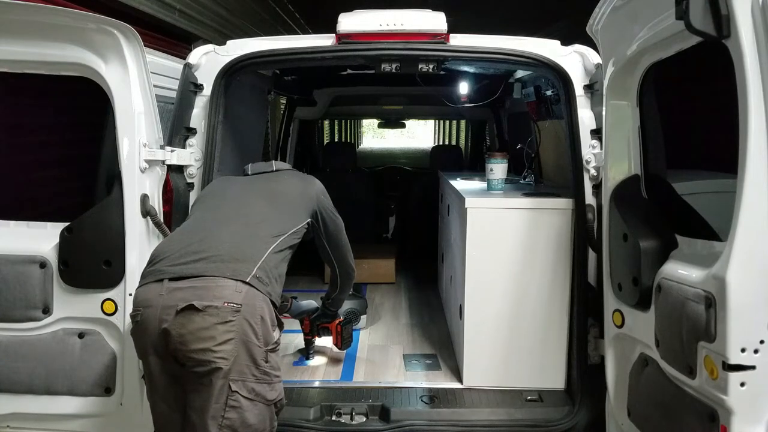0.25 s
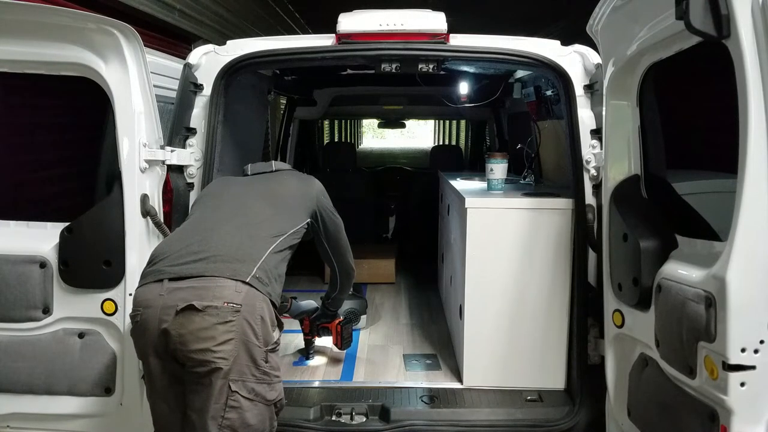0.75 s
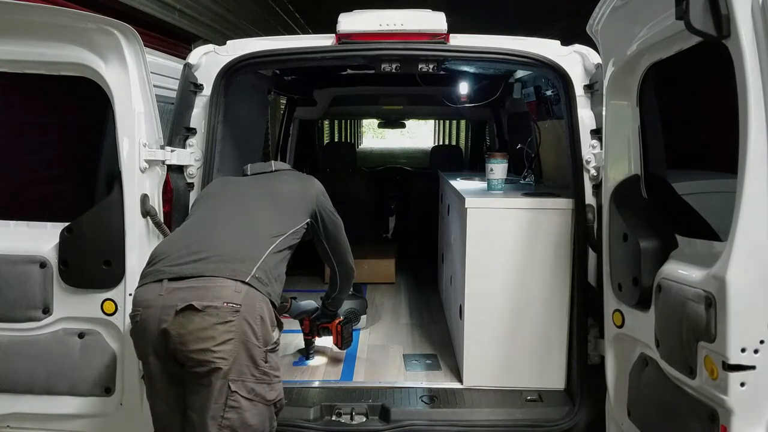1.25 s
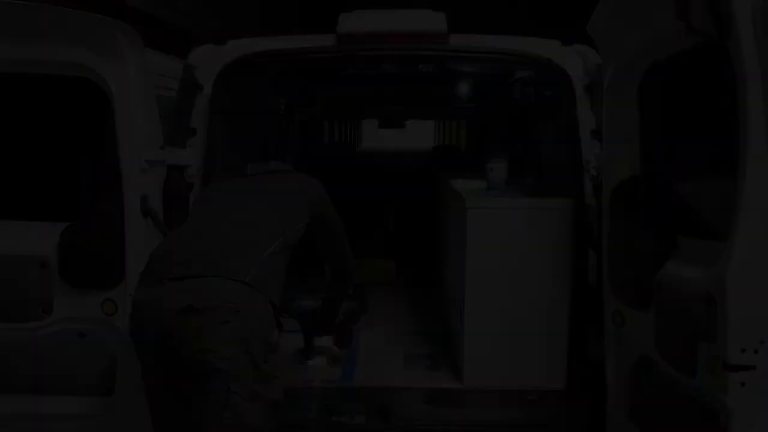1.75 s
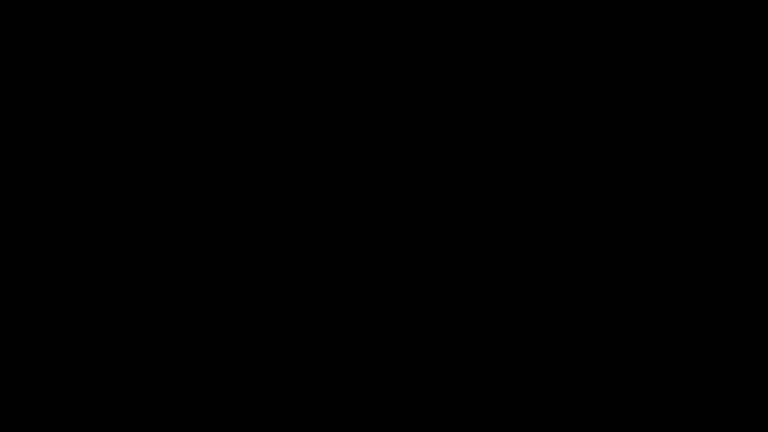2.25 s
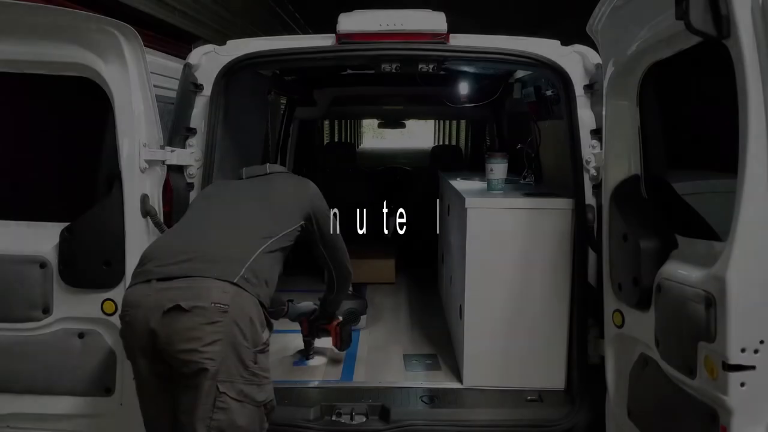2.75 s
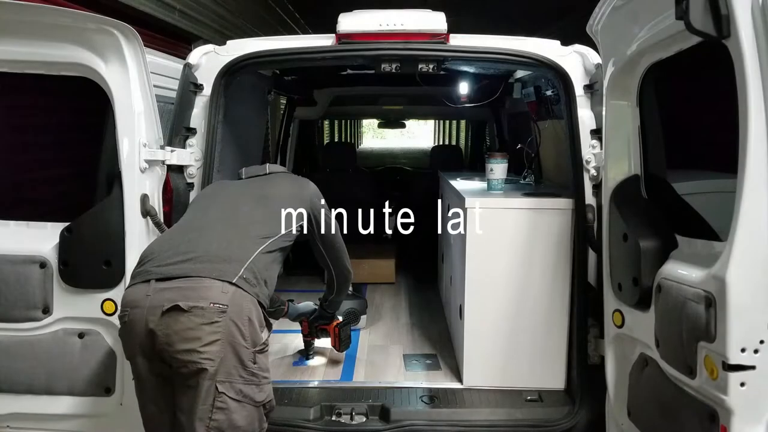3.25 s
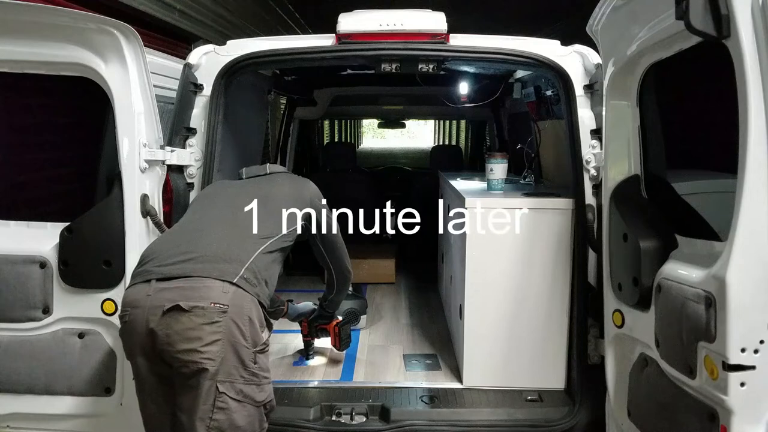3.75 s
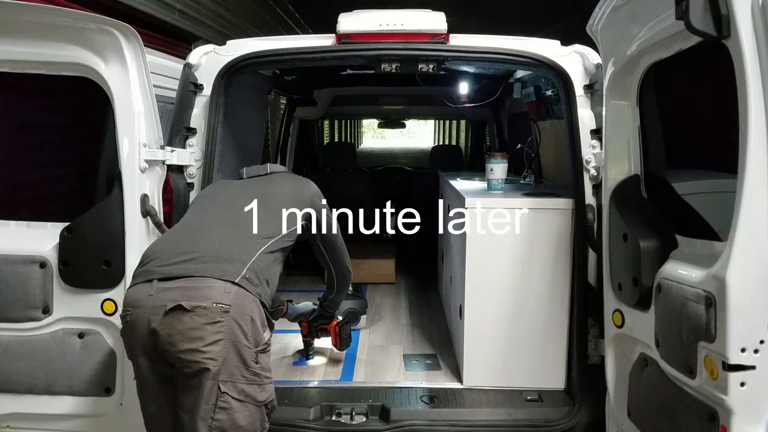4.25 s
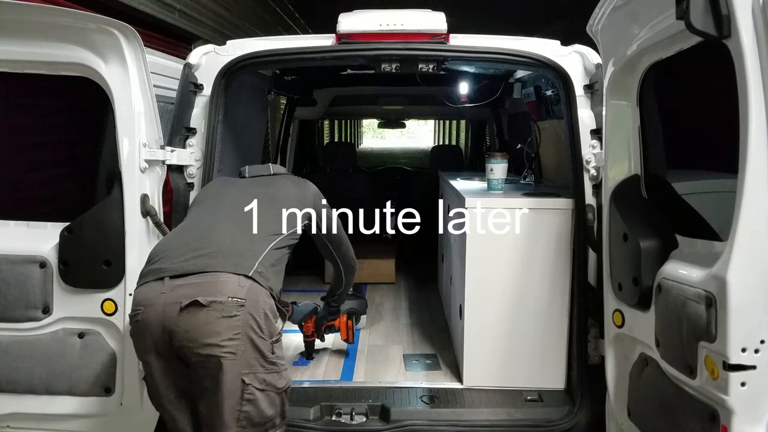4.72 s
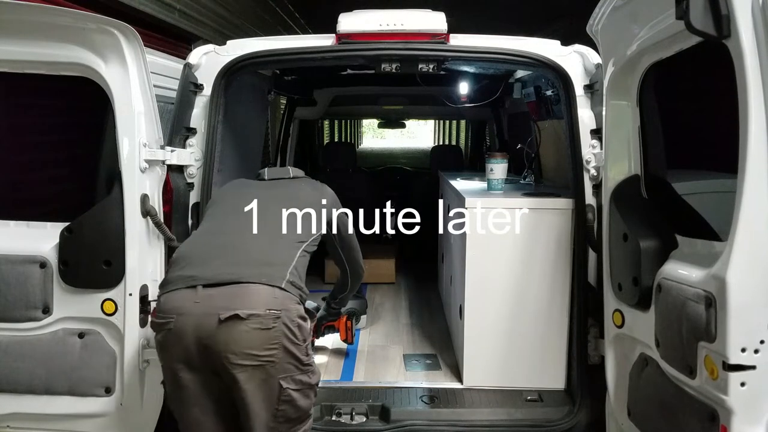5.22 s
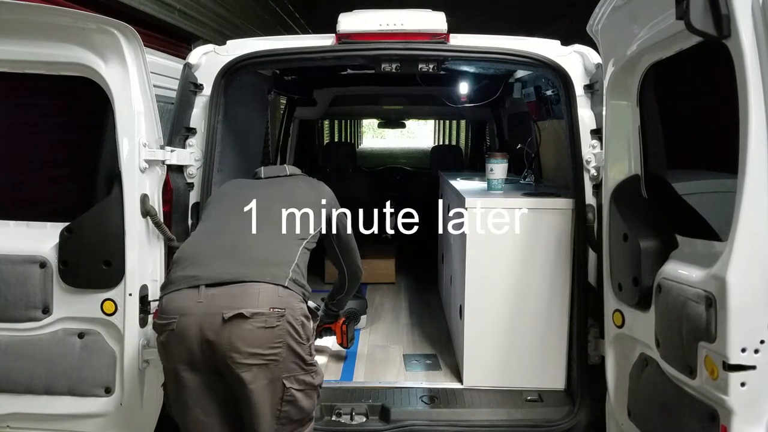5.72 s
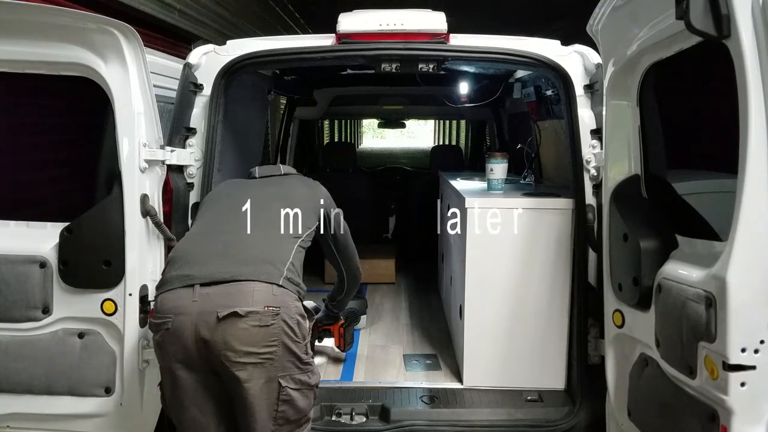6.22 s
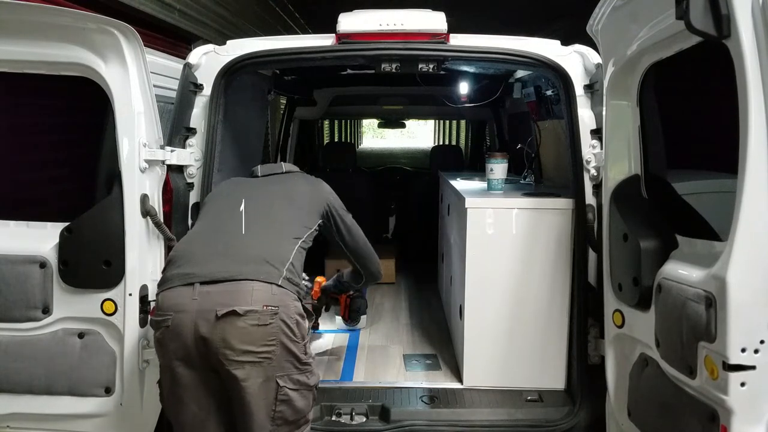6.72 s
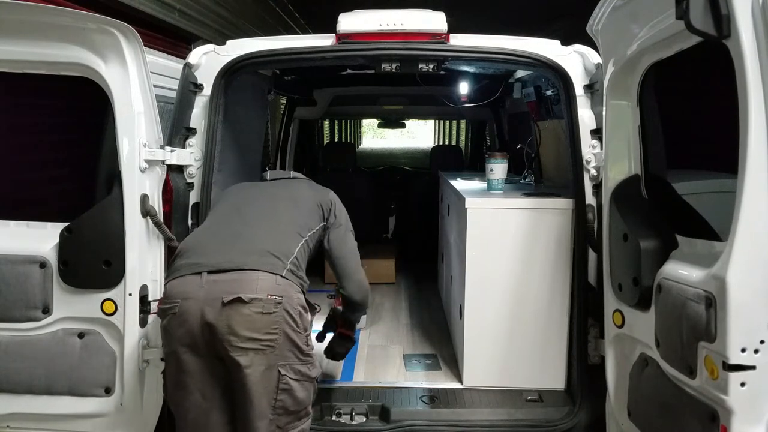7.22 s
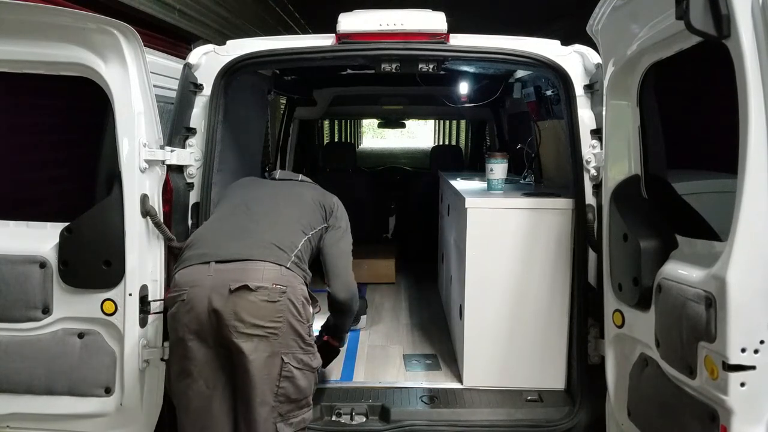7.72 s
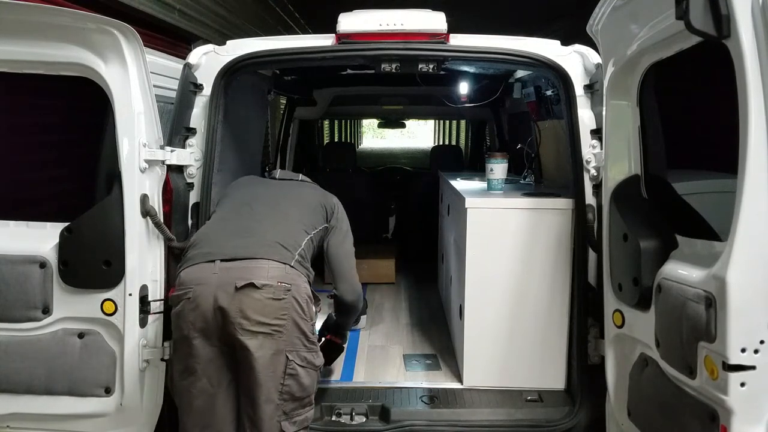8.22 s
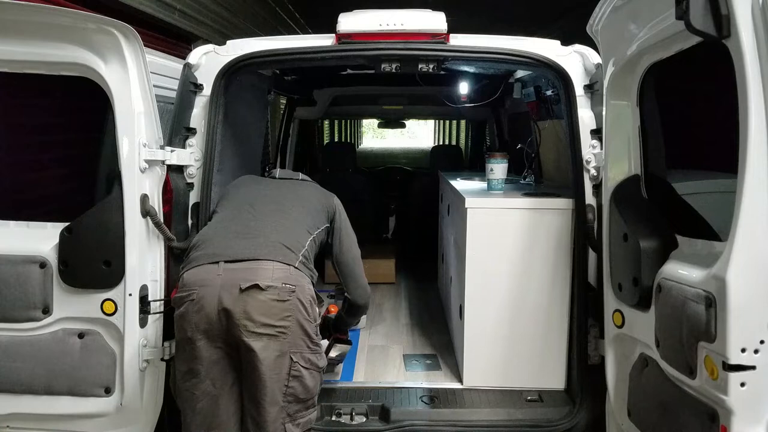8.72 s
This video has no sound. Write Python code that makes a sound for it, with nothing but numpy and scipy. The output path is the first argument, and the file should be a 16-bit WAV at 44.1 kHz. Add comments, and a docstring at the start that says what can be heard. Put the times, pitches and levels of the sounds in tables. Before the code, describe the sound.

A cordless drill with a hole saw grinds and squeals through a van's steel floor, binds and stops, cuts harder again, breaks through, then whirs free.

```python
"""In a garage with a soft rush of air, a cordless drill drives a hole saw through the steel floor of a van.
First random chips tear and the panel drones; a shallow groove makes resonant noise squeal and catch each turn.
Deeper in, the squeal recedes; the saw binds, its tone breaks up and the braked motor's whine sinks to a stop.
The floor panel sings in brief sine moans, at the stop and through a harder second cut that breaks through.
Soft thumps rock the van; the free drill whines up in harmonics with fan noise, brakes, and leaves the room."""
import sys
import numpy as np
from scipy import signal
from scipy.fft import rfft, irfft, next_fast_len
from scipy.io import wavfile
from scipy.ndimage import uniform_filter1d

SR = 44100
rng = np.random.default_rng(int(sys.argv[2]) if len(sys.argv) > 2 else 0)


def put_to_file(sound):
    """Save the sound as 16-bit audio at rate SR, in the file named by the first command-line argument."""
    columns = np.atleast_2d(sound).T  # one column per channel
    safe = np.clip(columns, -1, 1)
    whole_steps = np.round(safe * 32767)
    wavfile.write(sys.argv[1], SR, whole_steps.astype(np.int16))


N = 395577
T = np.arange(N) / SR
SIZE = next_fast_len(N + 2 * SR, True)
BINS = np.fft.rfftfreq(SIZE, 1 / SR)

# Levels in the tables are those before the trims and modulation in the functions.
# steady air of the garage: f/Hz, level/dB
AMBIENCE = [(12, -33.5), (20, -27), (38, -5.5), (98, -8), (126, -6), (149, -13.5), (276, -9), (300, -17.5),
            (345, -11), (469, -14), (603, -11), (942, -13.5), (3600, -26.5), (9300, -44), (15800, -40)]
AMBIENCE_DB = -51
# likeness of that air at the two microphones: f/Hz, likeness/1
AMBIENCE_SAME = [(60, 1), (150, 0.95), (380, 0.84), (950, 0.16), (2380, 0), (15000, 0)]
# microphone pair, likeness of the two channels: f/Hz, likeness/1
SAME = [(100, .995), (260, .95), (480, .75), (700, .5), (2400, .45), (3300, .25), (7000, .35), (15000, .3)]
# microphone pair, phase lead of the left: f/Hz, lead/rad
LEAD = [(0, 0), (1120, -0.1), (1380, 0.6), (2150, 0.3), (2840, 0.4), (4310, 2.2), (4910, 1.5), (5510, 2.6),
        (6370, 2.5), (7670, 3.2), (8790, 3.2), (9910, 3.8), (12200, 5.9), (15800, 6.4)]
# microphone pair, left over right: f/Hz, level/dB
BALANCE_DB = [(60, 4), (110, -1), (200, 4), (380, -1.5), (700, -1), (1290, -2), (2380, -0.8), (4400, -2.5),
              (8120, -0.1), (15000, 2)]
# reverberation of the garage: f/Hz, t60/s, level/dB
GARAGE = [(100, 1.4, -18), (180, 1.17, -8), (270, 0.75, -10.5), (450, 1.53, -2.5), (666, 1.1, -3.5),
          (1980, 1.24, -5), (4950, 1.08, -4.5), (9800, 0.57, -7), (15000, 0.44, -14)]
EDGE_HZ = 15900  # top of the recorded band

# knocks of saw, trigger and chuck: t/s, level/dB, centre f/Hz, decay/s
KNOCKS = [(0.234, -14.5, 1500, 0.0031), (1.056, -16, 1450, .005), (1.285, -18, 1620, 0.0078),
          (1.398, -21, 1450, 0.0056), (3.814, -27, 1500, .004), (4.405, -17.5, 200, 0.012),
          (4.447, -35, 210, 0.01), (4.54, -30, 170, .01), (4.572, -25.5, 175, 0.0067),
          (4.625, -34, 170, 0.016), (4.798, -30.5, 1100, 0.0054), (4.847, -27, 450, 0.011),
          (4.862, -41, 2300, 0.011), (6.275, -30, 132, .03), (6.288, -27.5, 1600, 0.022),
          (6.307, -31, 1600, 0.023), (6.526, -38, 2090, 0.022), (6.78, -63, 4500, .012)]
# the van body rocks as the weight comes off the drill: t/s, level/dB, f/Hz, time to peak/s
THUMPS = [(6.059, -32, 62.5, 0.045), (6.069, -38, 38.6, 0.045), (6.66, -42, 69.7, 0.084)]
# the drill running free: t/s, whine f/Hz, whine level/dB, fan air level/dB
FREE_RUN = [(6.26, 796, -72, -63), (6.29, 910, -58, -43), (6.34, 1030, -45, -39), (6.42, 1050, -49.5, -41),
            (6.481, 1075, -44, -45), (6.54, 1040, -68, -40.5), (6.58, 820, -62, -50), (6.66, 398, -73, -63)]
# partials of the free motor: multiple/1, level/dB
WHINE = [(1, -1), (2, -6), (3, -8), (6, -14.5), (7, -20), (9, -20), (11, -13), (12, -25)]
# colour of the fan air: f/Hz, level/dB
FAN_AIR = [(200, -2), (700, -1), (2200, -1), (4500, -14), (7000, -11), (9000, -18.5), (12500, -11.5),
           (16000, -18)]
# the motor brakes in the groove: t/s, whine f/Hz, level/dB
BRAKE = [(4.41, 790, -40), (4.49, 750, -41), (4.55, 740, -37.5), (4.565, 480, -35), (4.585, 390, -41),
         (4.61, 300, -60)]
# the floor panel sings, at the first stop and through the second cut:
# t/s, length/s, start f/Hz, end f/Hz, level/dB
MOANS = [(4.42, 0.157, 485, 466, -42.5), (4.63, 0.12, 477, 473, -51), (4.88, 0.18, 501, 497, -29),
         (5.101, 0.16, 561, 555, -32), (5.15, 0.2, 438.6, 450, -31), (5.691, 0.11, 563, 557, -32),
         (5.76, 0.24, 497, 513, -31), (5.981, 0.18, 602, 604, -34.5)]
# the saw groans as it binds and drags to rest; later the gears chirp as the motor brakes:
# t/s, half length/s, f/Hz, width/Hz, level/dB
RUBS = [(1.1, 0.47, 264.6, 25, -32.5), (4.08, 0.17, 271, 17, -28.5), (4.32, 0.079, 165, 39, -28),
        (4.34, 0.057, 265, 46, -28), (4.365, .028, 1820, 160, -29.5), (4.36, .025, 1380, 130, -35),
        (6.55, .028, 2020, 330, -41.5), (6.545, 0.044, 640, 240, -45)]
# single chips crack off sharply: t/s, peak level/dB
CRACKS = [(0.9024, -35), (1.486, -40), (1.9674, -33), (2.0789, -31), (2.6414, -32), (2.7457, -30),
          (3.2191, -33), (3.9549, -32.5), (4.2046, -33), (4.3126, -28.5), (4.362, -29), (5.4667, -27)]

# rate of teeth passing, the motor sagging when leaned on: t/s, rate/Hz
SPEED = [(0, 207), (.8, 205), (1.6, 204), (2.0, 205.5), (2.5, 204.5), (3.1, 205.3), (3.65, 203.5),
         (3.9, 195), (4.2, 190), (4.29, 184), (4.34, 167), (4.39, 165), (4.87, 195), (5.0, 205.5),
         (6.1, 206.5)]
TEETH, TOOTH_GROUPS = 24, 6  # per turn
# the askew saw rocks once a turn, strongest midway through the first cut and weaker from 4 s on:
# t/s, share of full rocking/1, hardest spot/turns
ROCKING = [(0, 0.67, 0.95), (1.9, 0.5, 0.9), (2.4, 1, 0.63), (3.4, 0.88, 0.77), (4.0, 0.26, 0.57),
           (6.1, 0.36, 0.64)]
# the shake weakens, or in the second cut strengthens, once a turn: t/s, drop/dB (negative: rise), spot/turns
LULL = [(0, 9, 0.36), (2.1, 3, 0.24), (2.4, 22, 0.066), (3.7, 4, 0.18), (4.0, 8, .15), (4.4, -5, 0.13),
        (4.9, -3, .15)]
LULL_WIDTH = 0.08  # turns
# how true the saw runs: t/s, share of the rumble's power that repeats on every turn/1
TRUE_RUNNING = [(0, .45), (1.6, .45), (2.4, .75), (3.6, .85), (3.85, .1), (4.4, .1), (5.0, .2), (6.1, .2)]
# the saw binds before the stop: t/s, unsteadiness against free cutting/1
BINDING = [(0, 1), (.6, 2), (1.7, 2.2), (2.9, .5), (3.6, .6), (3.9, 5), (4.2, 6), (4.4, 6), (4.9, .8)]
# the saw snags in the groove: t/s, length/s, surge of the squeal/dB, surge of the bite/dB
SNAGS = [(0.09, .055, 8, -1.5), (0.228, 0.031, 6, -2.5), (0.42, 0.042, 5, 0), (.57, 0.032, 3.5, 1),
         (.69, 0.022, 7, 1), (0.786, 0.022, 6, -1), (.87, .02, 8, -2), (0.902, 0.043, 3.5, 0.5),
         (1.033, 0.038, 7.5, 0), (1.108, 0.024, 9, 0), (1.175, .02, 6, -0.5), (1.283, 0.038, 8, 3),
         (1.333, 0.033, 8, -0.5), (1.378, 0.033, 7, -1), (1.497, 0.026, 2, 0.5), (1.627, .03, 2.5, 1.5),
         (1.746, 0.031, 5, 1), (1.89, .015, 4, -3), (2.4, 0.052, 8, 0.5), (2.525, 0.033, 11, -0.5),
         (2.665, 0.038, 6, 2.5), (3.13, 0.038, 11.5, 0), (3.241, 0.044, 8, 1), (3.32, .03, 13, 1.5),
         (3.705, 0.033, 3, 2.2), (3.812, .014, 8, 1.5), (3.96, .03, 10, -0.5), (4.107, 0.024, -2, 1.5),
         (4.325, 0.072, -11, 3.5), (6.025, 0.056, 4, 2.5)]

# the highest tooth catches once a turn: t/s, peak level/dB, ring of the rim against the hiss/dB
CATCH = [(0, -35, -5), (2.3, -37, 1), (2.9, -36, -2), (3.6, -47, 0), (6.1, -27, -15)]
CATCH_SPOT, CATCH_JITTER = 0.7, 0.073  # place in the turn and its scatter, turns
CATCH_DECAY_S = 0.032  # of the lighter catches
# the turns that catch hardest: t/s, peak level/dB, ring of the rim against the hiss/dB, decay/s
HARD_CATCHES = [(0.086, -25, 6, 0.031), (.182, -23.5, -3, .04), (0.316, -27, 6, .016),
                (0.408, -24, -4, .018), (.432, -26, -4, 0.011), (0.554, -30, 10, 0.018),
                (.655, -29, -1, .04), (.785, -33, 8, .025), (0.894, -23, 0, 0.019), (.995, -28, 2, 0.054),
                (1.483, -23, -10, .006), (1.612, -26.5, 4, .028), (1.72, -24, -6, .012),
                (1.85, -26.5, 2, 0.02), (1.962, -25, 9.5, 0.018), (2.078, -32, 15, 0.014),
                (3.22, -29, 1, .025), (4.204, -29, -3, .025)]
# hiss of a catch: f/Hz, level/dB
SCRAPE_COLOUR = [(800, -25), (2500, -12), (4000, 10.5), (5500, -5), (7500, 6.5), (9000, -8.5), (13000, 3.5),
                 (16000, -24)]
# the saw wall rubbing in the groove: t/s, level/dB
SQUEAL = [(0.0, -22), (.06, -29), (.3, -25.5), (0.62, -28), (.95, -26), (1.24, -29), (1.45, -25),
          (1.58, -27.5), (1.9, -27), (2.14, -38), (3.2, -37.5), (3.72, -39), (4.39, -31)]
# modes of the saw's cup: f/Hz, width/Hz, level/dB
CUP = [(1192, 17, -7.5), (1222, 31, -16), (1328, 44, -4.5), (1380, 9.9, -2.5), (1439, 26, 0.5),
       (1487, 20, -4.5), (1504, 20, -3), (1565, 13, -12), (1605, 11, -5.5)]
# drone at the tooth rate, one table a cut: t/s, level/dB
DRONE = [
    [(0.0, -24.5), (1.51, -37), (1.68, -30), (1.8, -41), (1.91, -27.5), (2.28, -30.5), (2.88, -27),
     (3.04, -19), (3.68, -25), (3.76, -34), (3.9, -26), (4.39, -22.5)],
    [(4.865, -28), (4.95, -35), (5.03, -19.5), (5.11, -24), (5.21, -27.5), (5.27, -21.5), (5.4, -17.5),
     (5.5, -21.5), (5.64, -22.5), (5.77, -26.5), (5.84, -19.5), (5.98, -20), (6.03, -33), (6.11, -33)],
]
DRONE_SLIP = .22  # rad, in free cutting

# effort of the saw, one table a cut: t/s, panel shake level/dB, feed pressure level/dB, bite level/dB
CUTS = [
    [(0.0, -33.5, -24, -25.5), (0.59, -37, -25.5, -27.5), (0.95, -33, -24, -27), (1.31, -34.5, -26, -27.5),
     (2.12, -37.5, -26.5, -29.5), (2.3, -32, -29.5, -31), (2.42, -31, -25.5, -28.5),
     (2.68, -30, -23.5, -28), (2.83, -33.5, -26.5, -28.5), (2.96, -31, -22.5, -25.5),
     (3.74, -28, -24, -27.5), (4.21, -30, -20.5, -25), (4.39, -29, -23.5, -26.5)],
    [(4.862, -33, -23.5, -23.5), (4.93, -31, -17.5, -20), (5.18, -28, -18, -21), (5.37, -30, -19.5, -22),
     (5.91, -26.5, -18.5, -21.5), (6.11, -31, -23.5, -24.5)],
]
# broad colour of the sawn floor: f/Hz, level/dB
STEEL = [(24, -66.5), (40, -74), (89, -9), (125, -6), (143, -4.5), (165, -3), (200, 2.5), (232, -8.5),
         (268, -4), (362, -13.5), (453, -12.5), (643, -15.5), (805, -15.5), (1140, -17), (2360, -23),
         (8890, -43.5), (15800, -41.5)]
# modes of the floor panel: f/Hz, width/Hz, lift/dB
PANEL = [(111, 40, 6.4), (227, 24, 3.5), (258.7, 14, 4.1), (309.8, 7.8, 3.9), (400, 13, 2.2),
         (479, 44, 4.6), (605, 9.9, 6.7), (702, 43, 3.8), (743, 25, 5.8), (820.5, 29, 6.7), (950, 50, 1.6),
         (1054, 36, 6.3), (1230, 11, 1.1), (1400, 43, 1.8), (1536, 140, 5.3), (1621, 25, 5.1),
         (1775, 117, 7.3), (1883, 41, 2.7), (2090, 100, 5.7), (2320, 160, 5.9), (2220, 44, 2.6),
         (2643, 16, 2.1), (2886, 38, 6), (3240, 11.7, 1.4), (3600, 30, 7.4), (4470, 54, 4.4),
         (4140, 38, 1.8), (4610, 32, 4.2), (5250, 35, 2.2)]
# change of the panel's colour in the second cut: f/Hz, level/dB
SECOND_COLOUR = [(60, 3), (85, 3.5), (120, -2), (150, -3.5), (205, -3), (240, -5), (280, -3.5), (360, -3.5),
                 (480, -1.5), (720, -4.5), (1050, 0), (1650, 1), (2400, -1.5), (3200, 2), (5000, -2.5),
                 (15000, 1.5)]
# rasp brought out by hard feeding: f/Hz, level/dB
RASP = [(1500, -12), (2400, 5), (3200, -3.5), (4000, -5.5), (5200, -8), (8000, -13), (10000, -29.5),
        (15000, -43)]


def gain_of(db):
    """Decibels to amplitude."""
    return 10 ** (np.asarray(db) / 20)


def evened(x):
    """Scales to unit rms."""
    return x / np.sqrt(np.mean(x ** 2) + 1e-20)


def read(points, hz):
    """Reads a frequency table along a logarithmic axis."""
    f, value = np.transpose(points)
    return np.interp(np.log(hz + 1), np.log(f + 1), value)


def along(table, column=1):
    """Reads one column over time, joined by straight lines."""
    rows = np.array(table)
    return np.interp(T, rows[:, 0], rows[:, column])


def shaped(x, response):
    """Filters by a response given on BINS."""
    return irfft(rfft(x, SIZE) * response, SIZE)[..., :N]


def below(hz, order=8):
    """Low-pass response, steeper with order."""
    return 1 / (1 + (BINS / hz) ** order)


def bell(hz, width):
    """Bell curve of one resonance, unity at its centre."""
    return 1 / (1 + (2 * (BINS - hz) / width) ** 2)


def wander(rate):
    """Random drift of unit rms, low-passed at rate Hz."""
    return evened(shaped(rng.standard_normal(N), below(rate, order=4)))


def ports(pair, likeness=SAME):
    """Blends two unrelated signals for a spaced pair: alike in the bass, apart in the treble."""
    a, b = rfft(pair, SIZE)
    same = np.clip(read(likeness, BINS), 0, .997)
    tilt = gain_of(read(BALANCE_DB, BINS) / 2)
    right = same * a + np.sqrt(1 - same ** 2) * b
    right = right * np.exp(-1j * read(LEAD, BINS))
    return irfft([a * tilt, right / tilt], SIZE)[:, :N]


def hiss():
    """White noise as it reaches both microphones."""
    return ports(rng.standard_normal((2, N)))


def background(level_db=.5, hiss_hz=2200, hiss_width=1200, hiss_db=4.5):
    """A soft, even rush of air: coloured noise, nearly mono in the bass."""
    air = ports(rng.standard_normal((2, N)), AMBIENCE_SAME)
    colour = gain_of(read(AMBIENCE, BINS) + hiss_db * bell(hiss_hz, hiss_width))
    return gain_of(AMBIENCE_DB + level_db) * evened(shaped(air, colour))


def garage(x, count=3):
    """Diffuse noise tails, each band dying at its own speed; the paths shift as the worker moves."""
    f, t60, db = np.transpose(GARAGE)
    out = np.zeros((2, N))
    for k in range(count):
        hz, t, z = signal.stft(rng.standard_normal((2, 3 * SR // 2)), SR, nperseg=256)
        life = read(np.c_[f, t60], hz)[:, None]
        level = gain_of(read(np.c_[f, db], hz))[:, None]
        even_energy = np.sqrt(np.log(1e6) / (life * SR))  # long tails are no louder than short ones
        z *= np.exp(-np.log(1000) * t / life) * even_energy * level
        tail = signal.istft(z, SR, nperseg=256)[1]
        tail *= np.clip(T[:tail.shape[1]] / 0.0082, 0, 1)  # soft onset
        share = np.cos(np.pi * (2.3 * T + k / count)) * np.sqrt(2 / count)
        out += signal.fftconvolve(x * share, tail, axes=1)[:, :N]
    return ports(out)


def knocks():
    """Tool contacts as short bursts of band-passed noise, thumps of the van body as swelling sines."""
    out, noise = np.zeros((2, N)), shaped(hiss(), below(5500, order=3))
    for s, db, hz, decay in KNOCKS:
        band = signal.butter(2, [hz / 1.7, hz * 1.7], "bandpass", fs=SR)
        clack = evened(signal.lfilter(*band, noise))
        age = np.maximum(T - s, 0)
        strike = (1 - np.exp(-age * hz)) * np.exp(-age / decay)  # rises within a cycle or two
        out += gain_of(db) * clack * strike
    for s, db, hz, peak in THUMPS:
        age = np.maximum(T - s, 0)
        swell = (age / peak * np.exp(1 - age / peak)) ** 2
        out += gain_of(db) * swell * np.sin(2 * np.pi * hz * age)
    return out


def free_run(waver=0.0061, fade_s=.02):
    """Out of the hole the motor winds up with a whine of partials and a rush of fan air, then brakes."""
    s, *columns = np.transpose(FREE_RUN)
    hz, whine_db, air_db = (np.interp(T, s, c) for c in columns)
    turns = np.cumsum(hz * (1 + waver * wander(58.0))) / SR
    whine = sum(gain_of(db) * np.sin(2 * np.pi * round(k) * turns) for k, db in WHINE)
    air = evened(shaped(hiss(), gain_of(read(FAN_AIR, BINS))))
    running = np.clip((T - s[0]) / fade_s, 0, 1) * (T < s[-1])
    return (gain_of(whine_db) * evened(whine) + gain_of(air_db) * air) * running


def brake(width_hz=35, fade_s=.015):
    """The trigger is let go in the groove: a fuzzy whine sinks and drops away as the saw stops."""
    phase = 2 * np.pi * np.cumsum(along(BRAKE)) / SR
    whine = evened(wander(width_hz) * np.cos(phase) + wander(width_hz) * np.sin(phase))
    sounding = np.clip((T - BRAKE[0][0]) / fade_s, 0, 1) * (T < BRAKE[-1][0])
    return whine * gain_of(along(BRAKE, 2)) * sounding


def moans(level_db=0, waver=0.0035, flutter_db=2):
    """The floor panel sings briefly in gliding sines, at the first stop and through the second cut."""
    out, bend = np.zeros(N), 1 + waver * wander(30)
    for s, length, hz, end_hz, db in MOANS:
        span = slice(int(s * SR), int((s + length) * SR))
        u = np.linspace(0, 1, len(T[span]))
        turns = np.cumsum((hz + (end_hz - hz) * u) * bend[span]) / SR
        song = evened(np.sqrt(u * (1 - u)) * np.sin(2 * np.pi * turns))
        out[span] += gain_of(db + level_db) * song
    return out * gain_of(flutter_db * wander(25))


def rubs():
    """Short swells of friction noise, each in one resonance, narrow or broad."""
    noise, out = hiss(), np.zeros((2, N))
    for s, half, hz, width, db in RUBS:
        swell = np.exp(-((T - s) / max(half, .01)) ** 4)
        out += gain_of(db) * evened(shaped(noise, bell(hz, width))) * swell
    return out


def cracks(level_db=1, decay=0.00129, scatter_db=-13, scatter_s=.012, lowest_hz=6500):
    """Snapping chips as bright noise ticks with a brief scatter off the van walls."""
    bright = evened(shaped(hiss(), 1 - below(lowest_hz, order=4)))
    envelope = np.zeros(N)
    for s, db in CRACKS:
        part = envelope[int(s * SR):][:SR // 10]
        age = T[:len(part)]
        tick = np.exp(-age / decay) + gain_of(scatter_db) * np.exp(-age / scatter_s)
        part += gain_of(db + level_db) * tick
    return bright * envelope


def rocking(teeth, lag=0):
    """Swing of the askew saw, highest at one spot of every turn."""
    return np.cos(2 * np.pi * (teeth / TEETH - along(ROCKING, 2) - lag)) * along(ROCKING)


def surge(column, rise=0.0035):
    """Surge in dB at every snag: it grabs at once and lets go gradually."""
    total = np.zeros(N)
    for row in SNAGS:
        grab = np.clip((T - row[0]) / rise, 0, 1)
        release = np.exp(-((T - row[0]) / max(row[1], .005)) ** 4)
        total += row[column] * grab * release
    return total


def while_cutting(cuts, column, release=0.037):
    """Amplitude of one control of the cuts; it starts at once and dies quickly when the teeth let go."""
    total = np.zeros(N)
    for cut in cuts:
        rows = np.array(cut)
        start = np.clip((T - rows[0, 0]) / .003 + 1, 0, 1)
        end = np.exp(-np.maximum(T - rows[-1, 0], 0) / release)
        total += start * end * gain_of(along(cut, column))
    return total


def catches(teeth, vary_db):
    """One catch a turn while cutting, of random timing and strength, beside the hard ones."""
    at, peak_db, ring_db = np.transpose(CATCH)
    rows, turns = list(HARD_CATCHES), teeth / TEETH
    for turn, (late, strength) in enumerate(rng.standard_normal(size=(60, 2))):
        s = np.interp(turn + CATCH_SPOT + CATCH_JITTER * late, turns, T)
        cutting = any(cut[0][0] < s < cut[-1][0] for cut in CUTS)
        hard_turn = any(abs(s - row[0]) < .05 for row in HARD_CATCHES)
        if cutting and not hard_turn:
            peak = np.interp(s, at, peak_db) + vary_db * strength
            rows.append((s, peak, np.interp(s, at, ring_db), CATCH_DECAY_S))
    return rows


def scrapes(teeth, level_db=-8, vary_db=2, rise=0.0028, rim_hz=4800, rim_width=650, rim_db=-1):
    """Once a turn a catching tooth sprays fine chips as hiss and rings the rim of the saw."""
    spray = hiss()
    flecks = signal.lfilter([1], [1, -np.exp(-1 / (.0006 * SR))], rng.random(N) < 170 / SR)
    gritty = spray + 2.2 * flecks * shaped(spray, 1 - below(8000))  # single chips tick in the top octave
    fizz = evened(shaped(gritty, gain_of(read(SCRAPE_COLOUR, BINS))))
    rim = evened(shaped(spray, bell(rim_hz, rim_width)))
    out = np.zeros((2, N))
    for s, db, ring_db, decay in catches(teeth, vary_db=vary_db):
        span = slice(int(s * SR), int((s + .25) * SR))
        age = np.maximum(T[span] - s, 0)
        swell = (1 - np.exp(-age / rise)) * np.exp(-age / decay)
        scrape = fizz[:, span] + gain_of(rim_db + ring_db) * rim[:, span]
        out[:, span] += gain_of(db + level_db) * swell * scrape
    return out


def squeal(teeth, level_db=-1.5, deep_db=-1, stutter_db=2.0, turn_db=2.7, tight_lag=0.047, hop_db=-1.1):
    """Stick and slip on the saw wall, as noise, rings the cup's modes; most snags make it surge."""
    slip, ring = rfft(hiss(), SIZE), np.zeros((2, N))
    for hz, width, lift in CUP:
        mode = irfft(slip * bell(hz, width), SIZE)[:, :N]
        ring += mode * gain_of(lift + hop_db * wander(4.7))
    power = uniform_filter1d((ring ** 2).mean(0), size=SR // 80)
    ring = ring / np.sqrt(abs(power) + 1e-12)  # friction saturates, so the ring holds steady
    rub = gain_of(turn_db * rocking(teeth, tight_lag) + stutter_db * wander(83))
    groove_db = np.interp(T, [1.95, 2.25], [level_db, deep_db])  # trim from shallow to deep groove
    return evened(ring * rub) * while_cutting([SQUEAL], 1, release=0.0074) * gain_of(groove_db + surge(2))


def drone(teeth, level_db=-0.65, flutter_db=1.1):
    """The panel is pumped at the tooth rate; phase slip and flutter break up the tone as the saw binds."""
    binding = along(BINDING)
    tone = np.sin(2 * np.pi * teeth + DRONE_SLIP * binding * wander(13.0))
    tone = tone * gain_of(flutter_db * np.sqrt(binding) * wander(22))
    return gain_of(level_db) * evened(tone) * while_cutting(DRONE, 1)


def chatter(per_s=55, size=0.41, decay=0.0019):
    """Gain of the cut as single teeth dig in at random and rasp for a moment."""
    digs = np.minimum(rng.exponential(1, N), 2.5) * (rng.random(N) < per_s / SR)
    digs = digs * np.clip(along(ROCKING), 0, 1)  # digs follow the share of rocking
    return 1 + size * signal.lfilter([1], [1, -np.exp(-1 / (decay * SR))], digs)


def chips(pull, per_s=10000, scatter_s=0.0075, crack=2.23, count=8):
    """Chips snap off around the groove; each place scatters through the van in its own way."""
    size = gain_of(3 * np.minimum(rng.exponential(1, N), 4.5)) * rng.choice([-1, 1], N)
    snaps = pull * size * (rng.random(N) < per_s / SR)
    place, t = rng.integers(0, count, N), T[:SR // 16]
    fading = np.exp(-t / scatter_s) + crack * np.exp(-t / 0.00046)
    paths = rng.standard_normal((count, 2, len(t))) * fading
    heard = np.zeros((2, N))
    for k in range(count):
        heard += signal.oaconvolve((snaps * (place == k))[None], paths[k], axes=1)[:, :N]
    return evened(ports(heard))


def judder(teeth, lowest=8, highest=52, accent_db=5, drift_per_s=0.24):
    """Uneven teeth thump the panel in a pattern that repeats each turn and drifts as the groove wears."""
    k = np.arange(1025)  # harmonics of the turn
    chosen = (k >= lowest) * (k <= highest) * (k != TEETH)  # the tooth rate itself is the drone
    height = chosen * gain_of(accent_db * (k % TOOTH_GROUPS == 0))
    pattern = np.fft.ifft(height * np.exp(2j * np.pi * rng.random((2, len(k)))), 4096).real
    spots = np.linspace(0, 1, pattern.shape[1], endpoint=False)
    a, b = (np.interp(teeth / TEETH % 1, spots, p) for p in pattern)
    wear = np.pi * drift_per_s * T
    return evened(a * np.cos(wear) + b * np.sin(wear))


def repeating(tearing, teeth, top_hz=430):
    """While the saw runs true, its regular judder takes the place of chance in the bass."""
    share = np.clip(along(TRUE_RUNNING), 0, 1)
    bass = shaped(tearing, below(top_hz, order=12))
    return tearing + (np.sqrt(1 - share) - 1) * bass + np.sqrt(share) * bass.std() * judder(teeth)


def lull(teeth):
    """Shake that weakens, or in the second cut strengthens, at one spot of every turn, its power levelled."""
    away = (teeth / TEETH - along(LULL, 2) + .5) % 1 - .5
    gain = gain_of(-along(LULL) * np.exp(-(away / LULL_WIDTH) ** 2))
    return gain / np.sqrt(uniform_filter1d(gain ** 2, size=SR // 4))


def grind(teeth, shake_db=-1, feed_db=-2.0, bite_db=-2.5, rasp_db=-6.0, turn_db=1.5, uneven_db=0.4,
          stiff_hz=87, loose_hz=70, snag_share=0.88):
    """Tooth after tooth tears at the floor panel, which rings in its modes."""
    tooth = 1 + .15 * np.cos(2 * np.pi * teeth)
    pull = tooth * chatter() * gain_of(turn_db * rocking(teeth) + uneven_db * wander(20))
    tearing = repeating(chips(pull), teeth)

    modes_db = sum(db * bell(hz, width) for hz, width, db in PANEL)
    colour = gain_of(read(STEEL, BINS) + modes_db - 6.1 * bell(197, 55.0))  # leaves room for the drone
    second_colour = gain_of(read(SECOND_COLOUR, BINS))
    stiff = shaped(tearing, colour * (1 - below(stiff_hz, order=12)))
    loose = shaped(tearing, colour * (1 - below(loose_hz, order=12)) * second_colour)
    second_cut = T > (CUTS[0][-1][0] + CUTS[1][0][0]) / 2
    steel = np.where(second_cut, loose, stiff)

    low, mid = below(204), below(1356)
    snag_db = surge(3)
    bite = while_cutting(CUTS, 3) * gain_of(snag_db)
    shake = evened(shaped(steel, low) * lull(teeth))
    shake = shake * while_cutting(CUTS, 1, release=0.038) * gain_of(shake_db)
    body = evened(shaped(steel, mid - low))
    body = body * while_cutting(CUTS, 2) * gain_of(feed_db + snag_share * snag_db)
    grit = evened(shaped(steel, 1 - mid)) * bite * gain_of(bite_db)
    rasp = evened(shaped(tearing, gain_of(read(RASP, BINS))))
    rasp = rasp * bite ** 2 / bite.max() * gain_of(rasp_db)  # grows faster than the bite
    return shake + body + grit + rasp


def scene(drone_wet=0.56):
    """Saw, drill and van inside the garage, over its steady rush; the tones feed the room less."""
    teeth = np.cumsum(along(SPEED)) / SR  # teeth passed so far
    van = knocks() + free_run() + rubs() + cracks() + scrapes(teeth) + squeal(teeth) + grind(teeth)
    hum = brake() + moans() + drone(teeth)
    return background() + garage(van + drone_wet * hum) + van + hum


def record(dry):
    """The recorder's band limit, a steep low-pass."""
    lowpass = signal.firwin(511, EDGE_HZ, window=("kaiser", 9), fs=SR)
    return signal.oaconvolve(dry, lowpass[None], "same")


dry = scene()
out = record(dry)
put_to_file(out)
```